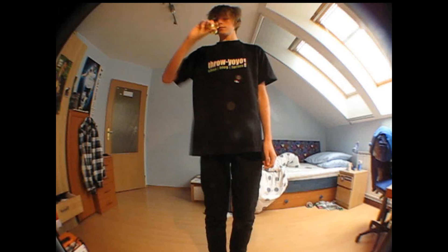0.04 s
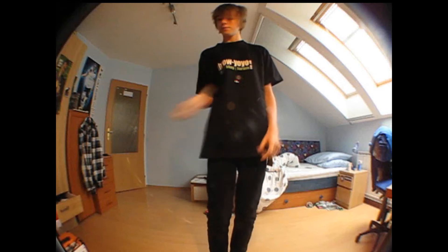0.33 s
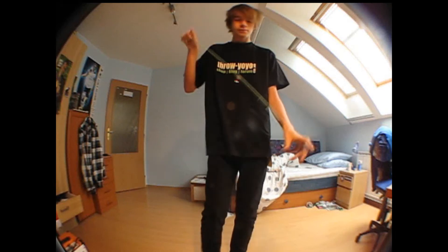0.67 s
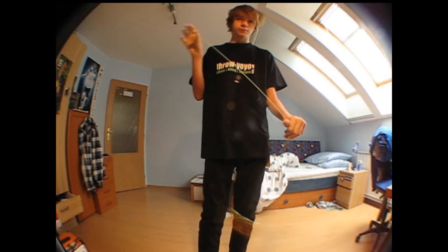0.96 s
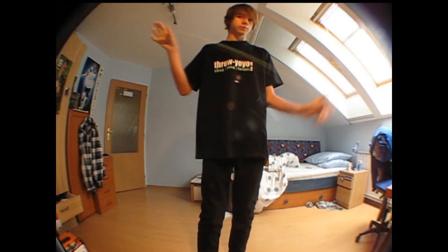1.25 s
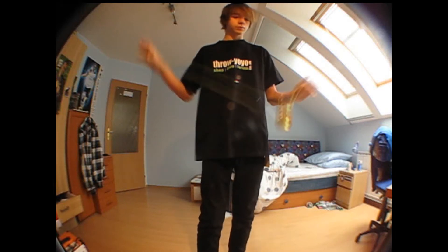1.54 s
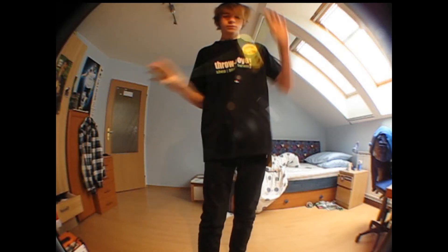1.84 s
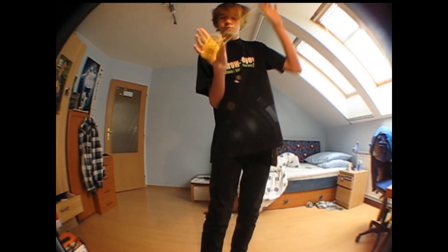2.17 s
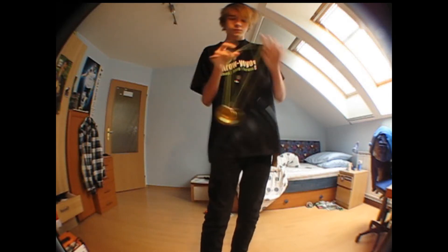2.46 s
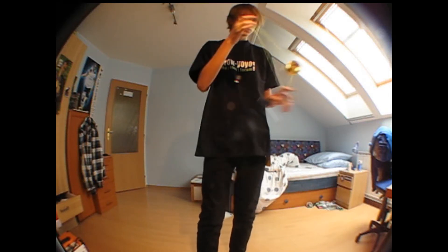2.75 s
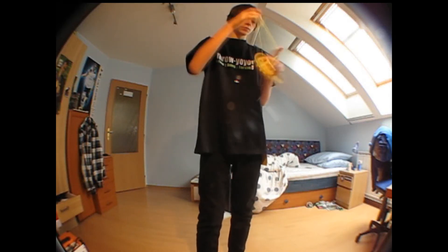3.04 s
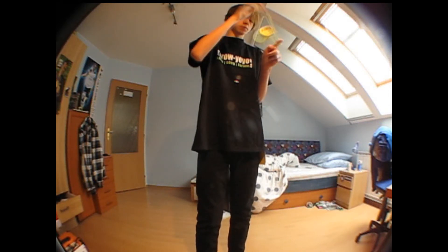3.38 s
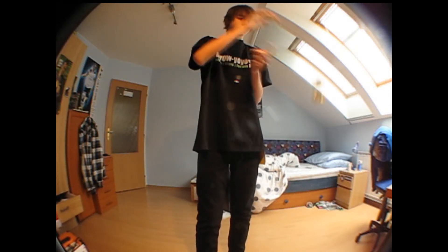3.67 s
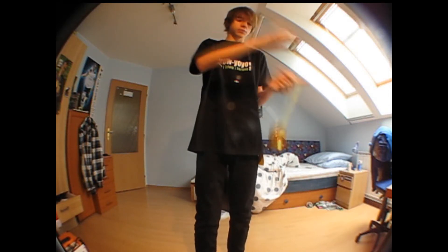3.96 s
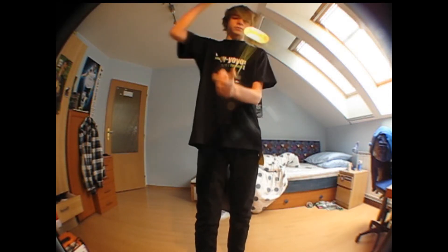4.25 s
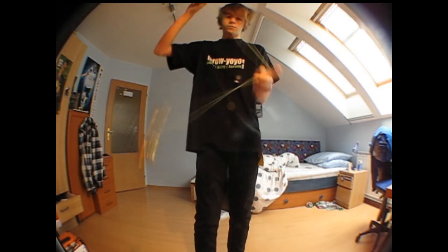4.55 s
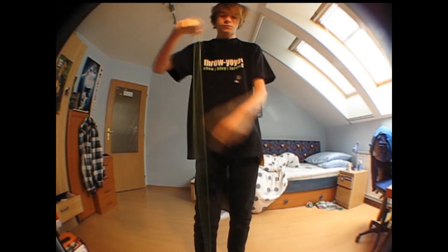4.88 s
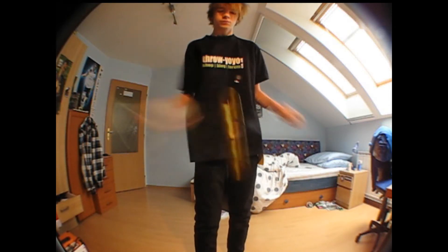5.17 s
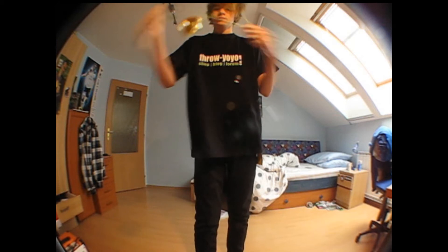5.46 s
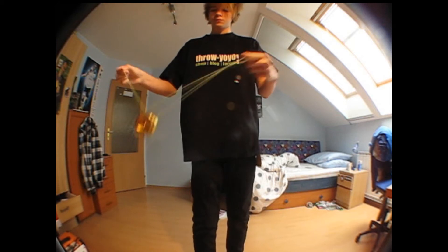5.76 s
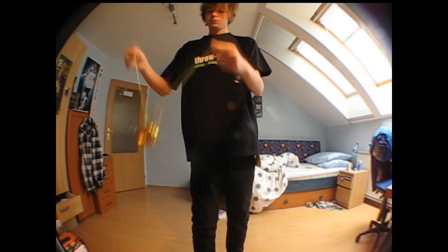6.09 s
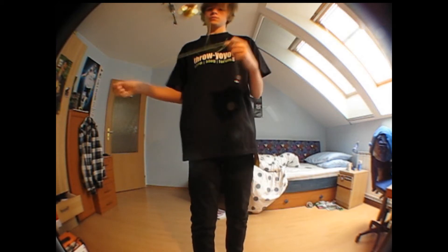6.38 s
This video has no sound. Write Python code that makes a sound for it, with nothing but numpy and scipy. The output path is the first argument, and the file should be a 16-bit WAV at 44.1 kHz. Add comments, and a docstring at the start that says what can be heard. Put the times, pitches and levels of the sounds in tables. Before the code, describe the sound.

After one sharp string crack, a spinning metal yo-yo hisses, rattles and faintly rings in uneven surges indoors, over a soft motor whirr.

```python
"""Metal yo-yo in a bedroom

A metal yo-yo is thrown, snaps to the end of its string and spins through a row of tricks.
The string hisses in the gap and scrapes over the fingers, the bearing chatters about once a turn,
and both make the metal halves ring. A thin whistle comes and goes; a camera whirrs in the quiet room."""
import sys
import numpy as np
from scipy import signal
from scipy.fft import rfft, irfft, next_fast_len
from scipy.io import wavfile
from scipy.ndimage import uniform_filter1d, map_coordinates

SR = 44100
rng = np.random.default_rng(int(sys.argv[2]) if len(sys.argv) > 2 else 0)


def transcribe(u):
    """Save the signal u as a 16-bit wav file named by the first command-line argument.

    u: samples, shape (n,) or (channels, n), limited to [-1, 1]; the rate is SR.
    q: integer samples, one column per channel.
    """
    v = np.clip(np.atleast_2d(u).T, -1, 1)
    q = np.round(v * 32767).astype(np.int16)
    wavfile.write(sys.argv[1], SR, q)


N = 287532
TIME = np.arange(N) / SR

# swings that pull the string taut and load the yo-yo:
# t/s, length/s, hiss/dB, chatter/dB, high ring/dB, chatter pitch/Hz
STRING_PULLS = [(0.357, 0.037, -48, -58, -60, 11500), (0.531, 0.046, -37.5, -31.5, -32, 11260),
                (.635, 0.18, -39, -40, -34.5, 13100), (0.831, .15, -43, -30, -34, 11090),
                (.99, .24, -41, -42, -35.5, 13200), (1.271, 0.25, -47, -42, -38.5, 13000),
                (1.5, 0.096, -38.5, -27.5, -36, 11670), (1.667, 0.055, -41, -35.5, -47, 11360),
                (1.801, 0.14, -45.5, -37, -49, 11570), (2.246, 0.052, -40.5, -34, -40, 11500),
                (2.319, 0.19, -42.5, -30, -35.5, 10760), (2.557, 0.13, -50, -38.5, -41, 11500),
                (2.83, .05, -52, -46, -43, 12100), (3.104, .14, -38.5, -34, -38, 11650),
                (3.322, 0.06, -44, -30.5, -48, 11730), (3.4, 0.032, -37, -43, -37, 12800),
                (3.531, 0.023, -42, -36, -28.5, 13200), (3.621, 0.028, -60, -40, -31, 13000),
                (3.703, 0.03, -41.5, -39, -44, 12600), (3.784, 0.18, -44.5, -34.5, -47, 11970),
                (3.961, 0.043, -49, -32, -43, 11270), (4.081, 0.19, -68, -38, -59, 11260),
                (4.377, 0.053, -44.5, -57, -56, 12580), (4.606, .06, -43.5, -43, -51, 12700),
                (4.753, .05, -41.5, -45, -42, 12600), (4.818, 0.051, -42, -51, -38, 13260),
                (5.01, 0.12, -43.5, -49, -42, 10500), (5.25, 0.032, -52, -45, -49, 10900),
                (5.687, 0.038, -41.5, -32, -26, 13100), (5.845, 0.34, -41.5, -43, -46, 12800),
                (6.111, 0.062, -41.5, -32, -36, 12800), (6.229, 0.025, -39, -50, -35.5, 12700)]
# the string runs over the fingers: t/s, length/s, scrape/dB, squeak relative to scrape/dB
FINGER_SCRAPES = [(0.351, 0.032, -48, -20), (0.532, 0.039, -39, -16), (.6, 0.045, -50, -20),
                  (0.797, 0.33, -47.5, -8), (1.495, 0.11, -60, -17), (2.24, 0.031, -62, 9),
                  (3.195, 0.036, -52, 5.5), (3.317, 0.051, -56, 10.5), (3.953, .06, -51.5, -17),
                  (5.9, 0.17, -57, -15), (6.086, .08, -47.5, -11)]
# the string snaps taut at the end of the throw: t/s, level/dB
STRING_SNAPS = [(0.5345, -30), (0.5411, -13.5)]
# colour of the string's hiss and the knocks' clicks: f/Hz, level/dB
HISS_SPECTRUM = [(1500, -39), (3000, -10), (4200, -8), (5000, -0.5), (5900, 3), (8000, 2.5), (10000, 0),
                 (12500, -0.5), (14500, -2), (16000, -18)]
# resonances struck in the bearing: f/Hz, width/Hz, level/dB
BEARING_MODES = [(12380, 770, -8.5), (12400, 370, 1.5), (13770, 82, 11)]


def amp(db):
    """Decibels to gain."""
    return 10 ** (np.asarray(db) / 20)


def unit(x):
    """Scale to rms 1."""
    return x / np.sqrt(np.mean(x ** 2) + 1e-20)


def along(points, hz):
    """Read (f/Hz, value) points on a log axis."""
    f, values = np.transpose(points)
    return np.interp(np.log(hz + 1), np.log(f + 1), values)


def curves(rows):
    """One value per sample for each column after the time."""
    times, *columns = np.transpose(rows)
    return [np.interp(TIME, times, column) for column in columns]


def wobble(rate):
    """A smooth random curve, rate knots a second."""
    return map_coordinates(rng.standard_normal(int(N * rate / SR) + 4), [TIME * rate])


def strokes(rows, attack_s, release_db_per_s):
    """Power envelope of (t/s, length/s, level/dB) strokes: each rises, holds and dies away."""
    power = np.zeros(N)
    for start, length, db in rows:
        first = int(start * SR)
        t = TIME[:min(SR, N - first)]
        rise = np.clip(t / attack_s, 0, 1)
        fall = amp(db - release_db_per_s * np.maximum(t - length, 0))
        power[first:first + len(t)] += (rise * fall) ** 2
    return power


def filtered(x, response):
    """x times a complex response of frequency."""
    size = next_fast_len(N + SR // 2)
    return irfft(rfft(x, size) * response(np.fft.rfftfreq(size, 1 / SR)), size)[:N]


def coloured(x, spectrum):
    """x through an EQ curve of (f/Hz, level/dB) points."""
    return filtered(x, lambda hz: amp(along(spectrum, hz)))


def resonate(x, modes):
    """x through (f/Hz, width/Hz, level/dB) resonances."""
    return filtered(x, lambda f: sum(amp(db) * 1j * f * width / (hz * hz - f * f + 1j * f * width)
                                     for hz, width, db in modes))


def band(x, centre_hz, width_hz):
    """A band made from x and carried to a steady or moving centre, at rms 1."""
    lows = filtered(x, lambda hz: 1 / (1 + (hz / (width_hz / 2)) ** 2))
    cycles = np.cumsum(np.broadcast_to(centre_hz, N)) / SR
    return unit(lows * np.cos(2 * np.pi * cycles))


def background():
    """A bed of room tone and a camera's steady whirr with a faint whine."""
    # colour of the quiet room: f/Hz, level/dB
    room_spectrum = [(20, -33), (40, -28), (70, -13.5), (120, -4.5), (280, 0.5), (550, -2), (1000, -4),
                     (1600, -5.5), (4000, -11.5), (16000, -41)]
    # resonances of the whirr: f/Hz, width/Hz, level/dB
    whirr_modes = [(620, 19, 1), (791, 68, 4.5), (962, 15, -11.5)]
    tone = amp(-51.5) * unit(coloured(rng.standard_normal(N), room_spectrum))
    whirr = amp(-52) * unit(resonate(rng.standard_normal(N), whirr_modes))
    whine = amp(-64.5) * np.sin(2 * np.pi * 4740 * TIME + 0.58 * wobble(8.4))
    return tone + whirr + whine


def bedroom(x):
    """The walls answer with a short tail, longest in the bass and shortest at the very top."""
    # decay of the room: f/Hz, t60/s
    decay_times = [(200, 0.71), (3000, 0.28), (8000, 0.56), (15000, 0.11)]
    hz, t, noise = signal.stft(rng.standard_normal(SR // 2), SR, nperseg=256)
    decay = amp(-60 * t / along(decay_times, hz)[:, None])
    tail = signal.istft(noise * decay, SR, nperseg=256)[1]
    predelayed = np.pad(x, (200, 0))
    return signal.fftconvolve(predelayed, tail / np.linalg.norm(tail))[:N]


def whistles():
    """A thin, wavering whistle swells and fades."""
    # each whistle: t/s, length/s, f/Hz, level/dB
    cues = [(0.16, .2, 8250, -57), (5.54, 0.22, 8350, -44.5), (6.265, 0.19, 8250, -49.5)]
    sound = np.zeros(N)
    for start, length, hz, db in cues:
        swell = np.sin(np.pi * np.clip((TIME - start) / length, 0, 1))
        sound += amp(db) * swell * band(rng.standard_normal(N), hz, width_hz=22)
    return sound


def snaps(crack_t60_s=0.004, twang_hz=962, twang_db=-30.5, twang_t60_s=0.76):
    """Two dry cracks as the string runs out; it rings on after each with a faint twang."""
    # colour of the taut string's crack: f/Hz, level/dB
    crack_spectrum = [(60, -30), (300, -8), (650, 8), (2000, -5), (8000, -4), (16000, 4)]
    cracks, t = np.zeros(N), np.arange(SR // 2) / SR
    twang = amp(twang_db - 60 * t / twang_t60_s) * np.sin(2 * np.pi * twang_hz * t)
    for start, db in STRING_SNAPS:
        crack = amp(-60 * t / crack_t60_s) * rng.standard_normal(len(t))
        cracks[round(start * SR):][:len(t)] += amp(db) * (crack + twang)
    return coloured(cracks, crack_spectrum)


def knocks(contact_t60_s=0.022, click_db=-6.5):
    """Each knock is a short burst of contacts that rings the bearing, with a broad click."""
    # sharp knocks of bearing and string: t/s, level/dB
    hits = [(0.535, -18.5), (0.5395, -19), (0.638, -20), (.8594, -20), (0.953, -21), (1.326, -24),
            (1.3828, -21), (1.5037, -24), (2.254, -19.5), (2.402, -20), (2.8314, -28), (3.117, -17),
            (3.541, -23), (3.626, -27), (4.004, -18.5), (4.8194, -28), (5.3045, -29), (5.697, -16),
            (5.7378, -26)]
    blows, clicks, t = np.zeros(N + SR), np.zeros(N + SR), np.arange(SR // 20) / SR
    for start, db in hits:
        burst = rng.standard_normal(len(t)) * amp(-60 * t / contact_t60_s)
        clicks[round(start * SR):][:len(t)] += amp(db + click_db) * burst
        burst[0] += 9  # the first contact is the hardest
        blows[round(start * SR):][:len(t)] += amp(db) * burst
    return resonate(blows[:N], BEARING_MODES) + coloured(clicks[:N], HISS_SPECTRUM)


def chatter(turns, rattling, scatter_turns=0.12, spread_db=3.5, opposite_db=-6, skid_t60_s=0.025):
    """The bearing ticks unevenly once a turn, and more weakly opposite; each pull has its own pitch."""
    half_turns = np.arange(int(2 * turns[-1]))
    timing, force = rng.standard_normal((len(half_turns), 2)).T
    onsets = np.interp(half_turns / 2 + scatter_turns * timing, turns, np.arange(N)).astype(int)
    sizes = amp(spread_db * np.clip(force, -2, 1.6) + opposite_db * (half_turns % 2))
    skid = amp(-60 * TIME[:SR // 25] / skid_t60_s)  # each tick is a brief skid of the balls
    ticks = signal.fftconvolve(np.bincount(onsets, sizes, N), skid)[:N] * rng.standard_normal(N)
    pitch_hz, = curves([(start + length / 2, hz) for start, length, *_, hz in STRING_PULLS])
    ring = amp(-5.5) * unit(resonate(ticks, BEARING_MODES))
    sizzle = amp(-6) * band(ticks, pitch_hz, width_hz=1740)
    return rattling * (ring + sizzle)


def friction(hiss_lead_s=0.03, idle_chatter_db=-5, scrape_by_hiss_db=-14.5):
    """Envelopes of hiss, chatter, high ring and scrape, from slack running, pulls and finger strokes."""
    # hiss of the string lying slack in the gap: t/s, level/dB
    slack_hiss = [(.16, -55), (.5, -48.5), (.56, -44), (2.1, -43.5), (3.9, -42), (4.4, -42.5),
                  (4.54, -48.5), (4.95, -45), (5.22, -48.5), (5.6, -46.5), (5.78, -42.5), (6.3, -47),
                  (6.5, -50)]
    slack_db, = curves(slack_hiss)
    start, length, hiss_db, chatter_db, ring_db, _ = np.transpose(STRING_PULLS)
    swells = zip(start - hiss_lead_s, length + hiss_lead_s, hiss_db)  # the hiss leads the jolt
    hiss = amp(slack_db) ** 2 + strokes(swells, attack_s=0.041, release_db_per_s=152)
    jolts, ring = [strokes(zip(start, length, db), attack_s=0.005, release_db_per_s=184)
                   for db in (chatter_db, ring_db)]
    rattle = amp(slack_db + idle_chatter_db) ** 2 + jolts
    fingers = strokes([row[:3] for row in FINGER_SCRAPES], attack_s=0.0074, release_db_per_s=132)
    scrape = amp(scrape_by_hiss_db) ** 2 * hiss + fingers
    return np.sqrt([hiss, rattle, ring, scrape])


def slips(turns, grain_db, throb_db):
    """Dense tiny slips of the string's fibres, pressed harder once a turn."""
    return unit(rng.standard_normal(N)
                * amp(grain_db * wobble(700) + throb_db * np.cos(2 * np.pi * turns)))


def mode_drives(rubbing, ringing):
    """Rubbing drives all modes of the halves; brushes add to the low and middle, pulls to the high."""
    # the string brushes the wall of a half: t/s, length/s, low mode/dB, middle modes/dB
    brushes = [(0.345, 0.053, -49, -67), (0.442, 0.085, -51.5, -64), (0.543, 0.11, -54, -37),
               (.98, 0.032, -48.5, -41.5), (1.047, 0.046, -49, -54), (1.107, .12, -70, -38.5),
               (1.538, 0.1, -49.5, -52), (1.86, 0.034, -51, -44), (2.237, 0.06, -57, -35),
               (3.18, 0.063, -52, -47), (3.31, 0.046, -47, -55), (3.717, 0.069, -63, -42),
               (3.811, 0.16, -52.5, -56), (4.39, 0.045, -57, -36.5), (5.31, 0.16, -65, -45.5),
               (5.684, 0.031, -53, -38.5), (6.24, 0.047, -55, -45.5)]
    start, length, low_db, middle_db = np.transpose(brushes)
    low_brush, middle_brush = [
        np.sqrt(strokes(zip(start, length, db), attack_s=0.0089, release_db_per_s=157))
        for db in (low_db, middle_db)]
    run_out = TIME > STRING_SNAPS[0][0]  # rubbing reaches the upper modes once the string has run out
    low = np.hypot(amp(-18) * rubbing, low_brush)
    middle = np.hypot(amp(-10) * rubbing * run_out, middle_brush)
    high = np.hypot(amp(-2) * rubbing * run_out, ringing)
    return low, middle, middle, high  # each half has its own middle mode, slightly detuned


def halves(turns, drives):
    """Friction keeps each mode of the metal halves ringing, with a restless strength."""
    # modes of the halves: f/Hz, width/Hz, level/dB
    metal_modes = [(3126, 29, 0), (5245, 22, -3.5), (5294, 23, -1.5), (13700, 93, 0)]
    sound = np.zeros(N)
    for (hz, width, db), drive in zip(metal_modes, drives):
        ring = resonate(slips(turns, grain_db=3.5, throb_db=4.5), [(hz, width, 0)])
        ring = unit(resonate(ring, [(hz, 7 * width, 0)]))  # steeper skirts
        # even out the ring's random swells so it sounds steadier
        swell = np.sqrt(np.abs(uniform_filter1d(ring ** 2, size=1500)) + 0.041)
        sound += drive * amp(db + 2.15 * wobble(22)) * ring / swell
    return sound


def string(turns, rubbing, scraping):
    """The string hisses in the gap, sings at its changing length, scrapes and squeaks on the fingers."""
    # resonance of the taut length of string: t/s, f/Hz
    string_pitch = [(.5, 10830), (.76, 8500), (.88, 10400), (1.0, 9700), (1.25, 8570), (1.5, 7160),
                    (1.7, 8760), (1.95, 5720), (2.25, 6100), (2.5, 7400), (3.0, 5940), (3.4, 8140),
                    (3.77, 5770), (4.0, 7500), (4.25, 7700), (4.47, 5310), (4.65, 7680), (4.92, 7100),
                    (5.07, 9400), (5.27, 10900), (5.34, 5920), (5.6, 5920), (5.8, 7300), (6.15, 7360),
                    (6.5, 5920)]
    hiss = unit(coloured(slips(turns, grain_db=2.5, throb_db=1.5), HISS_SPECTRUM))
    sing = band(slips(turns, grain_db=3, throb_db=-1.5), curves(string_pitch)[0], width_hz=2270)
    # colour of string on skin: f/Hz, level/dB
    scrape_spectrum = [(200, -28), (600, -6.5), (1100, -3), (2100, -2.5), (3000, -3), (4500, -6),
                       (9000, -39)]
    scrape = unit(coloured(slips(turns, grain_db=4, throb_db=0.7), scrape_spectrum))
    squeak = band(slips(turns, grain_db=3.5, throb_db=-2), centre_hz=2258, width_hz=660)
    squeaks = [(start, length, db + squeak_db) for start, length, db, squeak_db in FINGER_SCRAPES]
    squeaking = np.sqrt(strokes(squeaks, attack_s=0.0074, release_db_per_s=302))
    flutter = amp(1.6 * wobble(40))
    rub = rubbing * flutter * (amp(-1.4) * hiss + amp(-5.5) * sing)
    return rub + amp(1) * scraping * scrape + squeaking * squeak


def scene():
    """The yo-yo, slowly losing spin, with its room reverb over the background."""
    # speed of the spin: t/s, rate/(turns/s)
    spin_rate = [(0, 87), (3.6, 82), (6.5, 70)]
    turns = np.cumsum(curves(spin_rate)[0]) / SR
    rubbing, rattling, ringing, scraping = friction()
    metal = halves(turns, mode_drives(rubbing, ringing)) + chatter(turns, rattling) + knocks()
    yoyo = string(turns, rubbing, scraping) + metal + snaps() + whistles()
    return (amp(-0.5) * yoyo + amp(-11.5) * bedroom(yoyo) + background())[None]


def record(dry):
    """The sound opens after a moment of silence; a steep low-pass trims the very top."""
    silence_s, fade_s, cutoff_hz = 0.16, 0.005, 15900
    fade_in = np.clip((TIME - silence_s) / fade_s, 0, 1)
    return filtered(dry[0] * fade_in, lambda hz: 1 / (1 + (hz / cutoff_hz) ** 160))[None]


dry = scene()
out = record(dry)
transcribe(out)
```